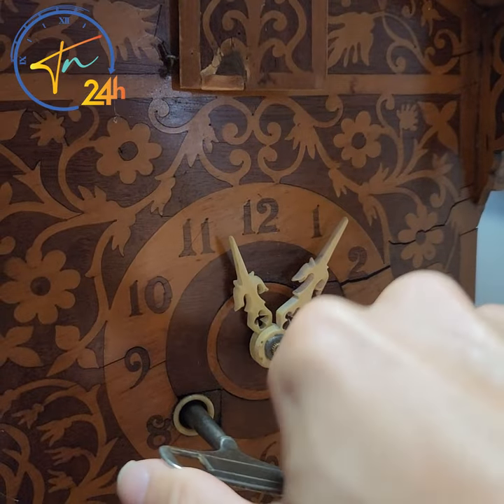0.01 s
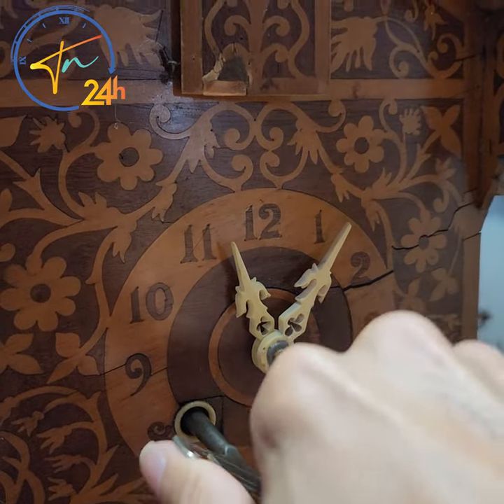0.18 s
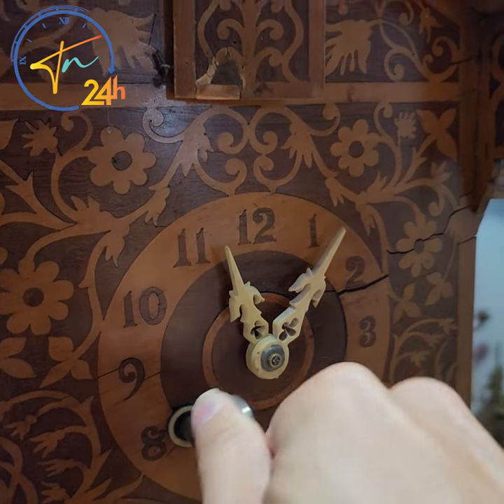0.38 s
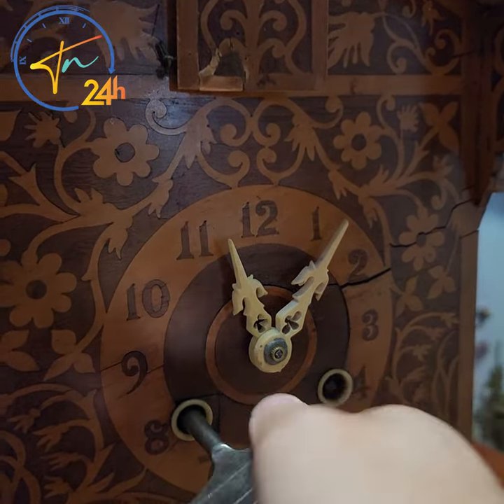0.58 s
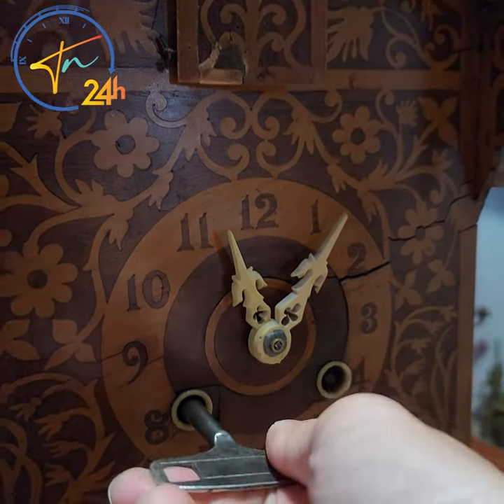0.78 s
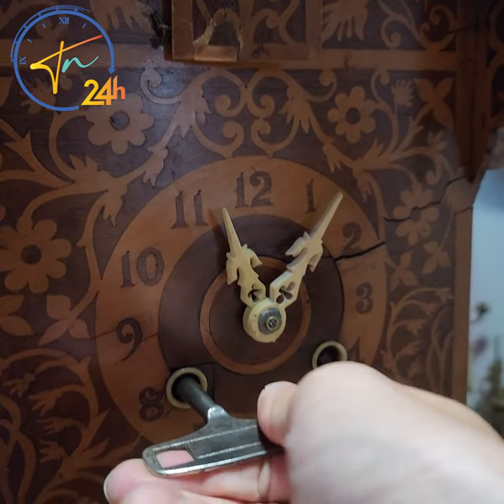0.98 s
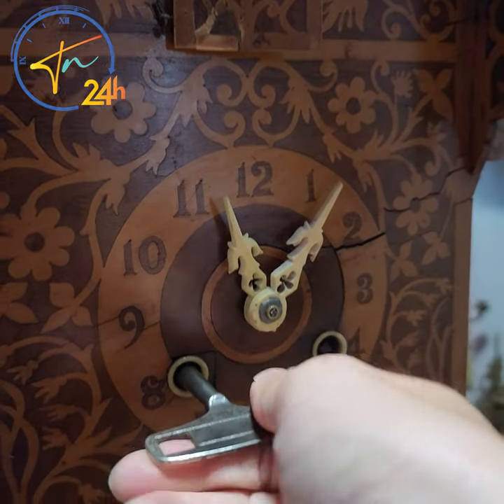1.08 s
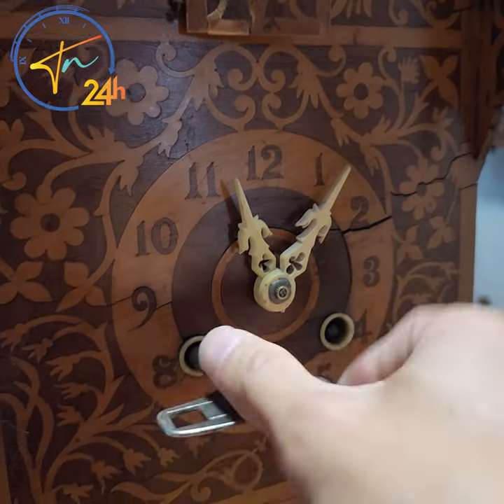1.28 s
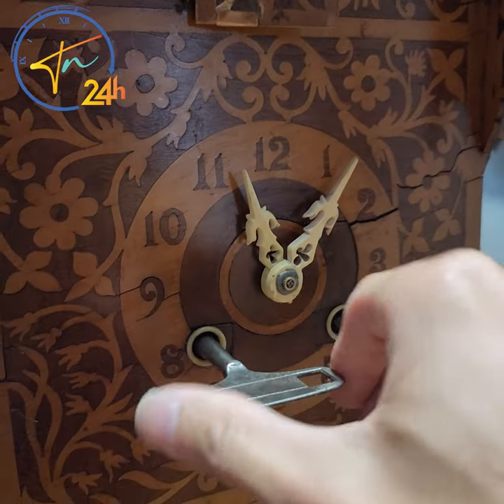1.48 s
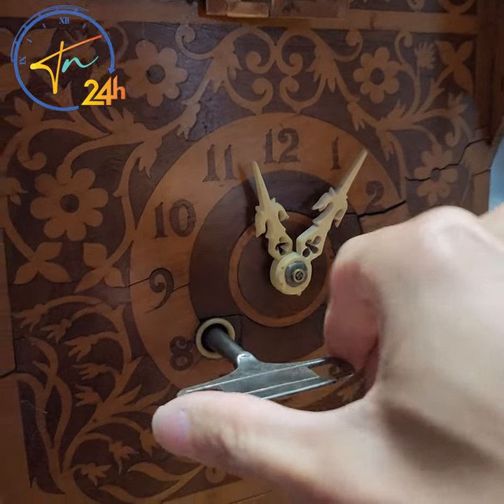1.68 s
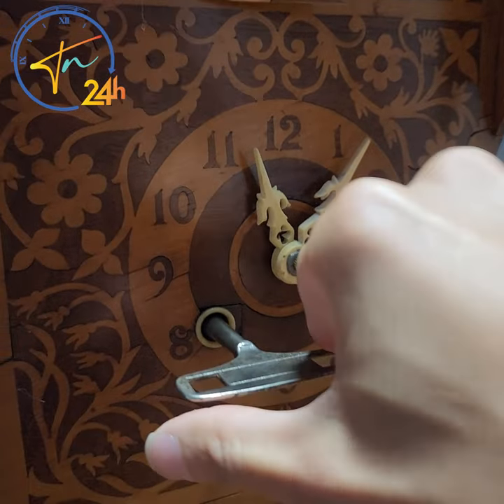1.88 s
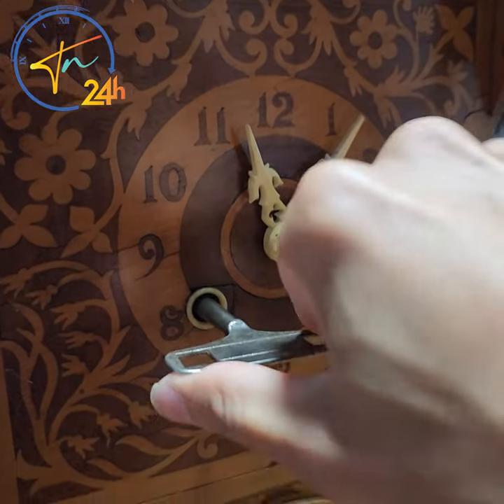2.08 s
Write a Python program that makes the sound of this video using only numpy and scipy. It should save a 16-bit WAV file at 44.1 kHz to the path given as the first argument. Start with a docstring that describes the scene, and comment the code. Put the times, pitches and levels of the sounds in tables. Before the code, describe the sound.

A key winds a wooden wall clock close by: nine quick, bright ratchet clicks from about 0.2 to 0.7 seconds. The loose key clinks lightly near 1.2 and 1.45 seconds. Fingers thump and rumble softly on the hollow case throughout, strongest at 1.4 seconds. The clock ticks faintly, about every 0.4 seconds, over quiet room tone, with barely audible distant bird chirps in the second half.

```python
"""A key winds a wooden wall clock: the pawl snaps over nine ratchet teeth, ringing metal and case.
The escapement ticks on, the loose key rattles, and fingers thump and rumble on the hollow case.
A quiet room answers the knocks over its steady tone; birds chirp faintly far outside."""
import sys
import numpy as np
from scipy import signal
from scipy.fft import rfft, irfft, next_fast_len
from scipy.io import wavfile
from scipy.ndimage import uniform_filter1d, map_coordinates

SR = 44100
rng = np.random.default_rng(int(sys.argv[2]) if len(sys.argv) > 2 else 0)


def materialize(psi):
    """Save the field psi as 16-bit PCM at rate SR to the path in sys.argv[1].

    A 1-D psi becomes a single channel; in a 2-D psi each row is a channel.
    """
    bounded = np.clip(np.atleast_2d(psi).T, -1, 1)
    quanta = np.round(bounded * 32767).astype(np.int16)
    wavfile.write(sys.argv[1], SR, quanta)


N = 92610

# stereo image of room tone and rumble, narrow in the bass: f/Hz, left-right likeness
BED_LIKENESS = [(30, 0.94), (200, 0.9), (600, .6), (1500, .1), (9000, .1)]


def amp(db):
    """Decibels to linear gain."""
    return 10 ** (np.asarray(db) / 20)


def unit(x):
    """Normalise to rms 1."""
    return x / np.sqrt(np.mean(x ** 2) + 1e-20)


def crest(x):
    """Normalise the loudest 4 ms to rms 1."""
    return x / np.sqrt(np.max(uniform_filter1d(np.mean(x ** 2, 0), size=176)))


def along(points, hz):
    """Read a curve of (f/Hz, value) points on a log frequency axis."""
    f, v = np.transpose(points)
    return np.interp(np.log(hz + 1), np.log(f + 1), v)


def add(track, start, sound):
    """Mix a sound in, start seconds into the track."""
    part = track[..., round(start * SR):][..., :sound.shape[-1]]
    part += sound[..., :part.shape[-1]]


def filtered(x, response):
    """Filter x through a complex frequency response."""
    size = next_fast_len(x.shape[-1] + SR // 4)
    spectrum = rfft(x, size) * response(np.fft.rfftfreq(size, 1 / SR))
    return irfft(spectrum, size)[..., :x.shape[-1]]


def resonances(modes):
    """Response of a resonator bank (f/Hz, width/Hz, gain/dB) with alternating polarity."""
    return lambda f: sum((-1) ** k * amp(db) * 1j * f * width / (hz * hz - f * f + 1j * f * width)
                         for k, (hz, width, db) in enumerate(modes))


def right_lag(hz, lag_s=0.00034, above_hz=700):
    """Response that delays the right channel; in the bass both sides move together."""
    delay = lag_s * hz ** 2 / (hz ** 2 + above_hz ** 2)
    return np.exp(-2j * np.pi * hz * delay * np.array([[0], [1]]))


def paired(noises, likeness, eq):
    """Mix two noises as mid and side into a stereo pair of given likeness and EQ."""
    def mid_side(hz):
        angle = np.arccos(np.clip(along(likeness, hz), -1, 1)) / 2
        return amp(along(eq, hz)) * [np.cos(angle), np.sin(angle)]
    mid, side = filtered(noises, mid_side)
    return np.array([mid + side, mid - side])


def room_tone(level_db=-63):
    """A steady, bass-heavy bed of air."""
    # spectrum of the air: f/Hz, gain/dB
    eq = [(20, -3.5), (60, -6), (150, -13), (250, -9), (400, -19.5), (700, -26), (1500, -28), (2300, -30),
          (3200, -39), (5000, -37.5), (6100, -36.5), (7500, -35), (9300, -45.5), (10500, -57),
          (16000, -86.5)]
    air = paired(rng.standard_normal((2, N)), BED_LIKENESS, eq)
    return amp(level_db) * unit(filtered(air, right_lag))


def room_reverb(x, wet_db=-12, rise_s=0.001):
    """The room's answer: a fresh noise tail, each frequency dying at its own speed."""
    # reverb time: f/Hz, t60/s
    decay = [(150, .25), (400, .3), (1000, 0.82), (2000, 0.41), (4000, 0.69), (8000, 0.63), (12000, 0.34),
             (16000, 0.12)]
    # colour of the tail: f/Hz, gain/dB
    eq = [(200, -0.5), (500, 4.5), (1000, -2), (2000, 5.5), (4000, -8), (8000, -5), (12000, 0.5),
          (16000, 4)]
    # stereo image of the tail: f/Hz, left-right likeness
    likeness = [(150, 0.97), (400, .9), (1000, .6), (4000, .5), (12000, 0.1)]
    hz, t, spectra = signal.stft(rng.standard_normal((2, SR * 3 // 4)), SR, nperseg=256)
    spectra *= amp(-60 * t / along(decay, hz)[:, None])
    tail = paired(signal.istft(spectra, SR, nperseg=256)[1], likeness, eq)
    tail *= 1 - np.exp(-np.arange(tail.shape[1]) / SR / rise_s)
    return amp(wet_db) * signal.fftconvolve(x, tail / np.linalg.norm(tail[0]), axes=1)


def far_birds(width_hz=220):
    """Whistles blurred by distance: narrow noise under a quick rise and a slower fall."""
    # bird calls: t/s, length/s, f/Hz, level/dB
    chirps = [(0, 0.032, 5880, -80), (0.038, 0.052, 6020, -87), (1.27, .08, 7300, -72),
              (1.38, .06, 6200, -79.5), (1.795, 0.045, 6030, -77.5), (1.847, 0.035, 3680, -79),
              (1.843, .04, 7400, -71.5), (1.91, .045, 7800, -71.5)]
    out, t = np.zeros((2, N)), np.arange(SR // 8) / SR
    for start, length, hz, db in chirps:
        noise = rng.standard_normal((2, len(t)))
        noise = noise + 1.1 * noise[0]  # partly shared, leaning left
        whistle = filtered(noise, lambda f: resonances([(hz, width_hz, 0)])(f) ** 2)
        progress = np.minimum(t / length, 1)
        add(out, start, amp(db) * unit(whistle) * np.sin(np.pi * progress ** 0.73))
    return out


def hand_rumble(lumps_db=2, lumps_per_s=14):
    """Hands on the case make a low, lumpy rumble, nearly mono."""
    # rumble envelope: t/s, level/dB
    envelope = [(0.0, -71), (0.12, -59), (0.21, -63.5), (0.37, -49), (0.44, -59.5), (0.56, -53.5),
                (1.02, -64.5), (1.06, -52.5), (1.25, -53), (1.37, -69.5), (1.48, -48.5), (1.54, -51.5),
                (1.6, -58.5), (1.68, -63.5), (1.73, -52.5), (1.78, -68), (1.82, -60.5), (2.1, -67.5)]
    # rumble spectrum: f/Hz, gain/dB
    eq = [(15, -7.5), (35, -3), (60, 0.5), (95, 0.5), (170, -4), (260, -2.5), (400, -13.5), (700, -25.5),
          (1500, -52.5)]
    t = np.arange(N) / SR
    times, db = np.transpose(envelope)
    lumps = map_coordinates(rng.standard_normal(64), [t * lumps_per_s])
    rumble = paired(rng.standard_normal((2, N)), BED_LIKENESS, eq)
    return unit(amp(lumps_db * lumps) * rumble) * amp(np.interp(t, times, db))


def finger_thumps(rise_s=0.008, beat_hz=22.2, upper_db=-8.5, gain_db=3.5, send_db=3):
    """Soft finger pads ring the two lowest wall modes of the case, which beat."""
    # finger landings: t/s, relative level/dB, lower mode f/Hz, t60/s
    thumps = [(0.101, -50.5, 233.4, 0.3), (0.314, -36.5, 235, 0.14), (0.599, -43, 230, 0.23),
              (0.734, -34.5, 238, 0.16), (0.881, -42.5, 242, 0.12), (1.029, -39.5, 247.7, 0.094),
              (1.19, -44.5, 236.8, 0.14), (1.402, -27.5, 237, 0.1), (1.571, -35.5, 246, 0.094),
              (1.693, -37, 239.2, 0.16), (1.922, -54.5, 239, 0.19)]
    out, t = np.zeros((2, N)), np.arange(SR // 3) / SR
    attack = 1 - np.exp(-(t / rise_s) ** 2)
    for start, db, hz, t60 in thumps:
        walls = np.sin(2 * np.pi * hz * t) + amp(upper_db) * np.sin(2 * np.pi * (hz + beat_hz) * t)
        ring = amp(db + gain_db) * attack * amp(-60 * t / t60) * walls * np.ones((2, 1))
        add(out, start, ring)
        add(out, start, amp(send_db) * room_reverb(ring))
    return out


def contacts(events, modes, rise_s, hold_s, t60, metal_db, case_db, rough_db, scatter_db, likeness):
    """Each contact scrapes the metal into ringing and pushes roughly on the case; the room answers."""
    # wooden case modes, rung by every contact: f/Hz, width/Hz, gain/dB
    case_modes = [(357, 35, -11.5), (527, 44, 2), (735, 19, 1.5)]
    # four bands of the metal's ring, low to high: from f/Hz, to f/Hz
    bands = [(0, 2800), (2800, 4500), (4500, 9200), (9200, 20000)]
    out, t = np.zeros((2, N)), np.arange(SR // 8) / SR
    envelope = np.minimum(t / rise_s, 1) ** 2 * amp(-60 * np.maximum(t - rise_s - hold_s, 0) / t60)
    angle = np.arccos(likeness) / 2
    left_right = np.array([[1], [-1]])
    for time, knock_db, pan_db, *band_dbs in events:
        mid, side = rng.standard_normal((2, len(bands), 1, len(t)))
        scrapes = envelope * (np.cos(angle) * mid + np.sin(angle) * side * left_right)
        struck_modes = [(hz, width, db + rng.normal(0, scatter_db)) for hz, width, db in modes]
        metal = np.zeros((2, len(t)))
        for (low, high), db, scrape in zip(bands, band_dbs, scrapes):
            bank = resonances([mode for mode in struck_modes if low < mode[0] <= high])
            ring = filtered(scrape, lambda f: bank(f) / (1 + 1j * f / high) ** 2)
            metal += amp(db + metal_db) * crest(ring)
        push = envelope ** 8 + amp(rough_db) * envelope * rng.standard_normal(len(t))  # pulse plus grit
        knock = amp(knock_db + case_db) * crest(filtered(push[None], resonances(case_modes)))
        hit = filtered(metal + knock, right_lag) * amp(pan_db / 2 * left_right)
        add(out, time - rise_s / 2, hit)
        add(out, time - rise_s / 2, room_reverb(hit))
    return out


def key_rattles():
    """The loose key clinks in its play."""
    # clinks: t/s, knock level/dB, left over right/dB, ring level/dB in four bands (levels relative)
    rattles = [(.096, -63.5, -3, -54, -69.5, -73, -95.5), (1.183, -47.5, 6.5, -47, -56, -62, -85),
               (1.191, -43, 2.5, -36.5, -41.5, -46, -69), (1.399, -52, -3, -56, -90, -70, -95),
               (1.443, -44.5, -1, -55, -63.5, -71.5, -98), (1.452, -38.5, 0.5, -42, -49, -59.5, -75),
               (1.484, -50, 9, -61, -74, -71, -95), (1.919, -53, 5.5, -65, -70, -75, -95)]
    # key modes: f/Hz, width/Hz, gain/dB
    modes = [(944, 100, -0.5), (1490, 220, -3), (2050, 220, -5), (2880, 170, -4.5), (3572, 250, 0),
             (5300, 250, -0.5), (6900, 1300, 2), (7400, 250, 2), (8596, 450, -15), (10000, 600, 0)]
    return contacts(rattles, modes, rise_s=0.0038, hold_s=0.0009, t60=0.0421, metal_db=-6.5,
                    case_db=-3.5, rough_db=-6.3, scatter_db=2, likeness=0.46)


def escapement_ticks():
    """The escapement catches with a light tick, mostly doubled by a rebound."""
    # ticks: t/s, knock level/dB, left over right/dB, ring level/dB in four bands (levels relative)
    ticks = [(0.125, -50.5, -0.5, -45, -57, -49, -60), (0.133, -50, 6, -64.5, -63, -56, -69),
             (0.865, -47, 2, -44.5, -56, -56.5, -66), (1.238, -52, -1.5, -49.5, -60.5, -52, -71),
             (1.25, -51, 4.5, -53, -60, -54.5, -63), (1.603, -51, 2, -46, -61, -56, -60),
             (1.612, -55, -3, -55.5, -62.5, -66.5, -72), (1.995, -51, 3.0, -50, -63.5, -56, -66),
             (2.007, -52.5, -0.5, -53, -64, -55.5, -65)]
    # escapement modes: f/Hz, width/Hz, gain/dB
    modes = [(960, 120, -8.5), (1217, 110, 1.5), (1563, 90, 0), (1985, 230, -3), (2860, 120, -5.5),
             (3650, 190, -5), (5030, 500, -4), (6380, 300, -5), (7500, 300, 4), (8000, 500, 2.5),
             (9530, 470, 2.5), (11500, 600, -19.5), (14500, 1500, -14)]
    return contacts(ticks, modes, rise_s=0.0014, hold_s=0.0004, t60=0.057, metal_db=2,
                    case_db=-2, rough_db=7, scatter_db=2.5, likeness=0.44)


def pawl_snaps():
    """As the key winds the spring, the pawl drops over each ratchet tooth with a bright snap."""
    # snaps: t/s, knock level/dB, left over right/dB, ring level/dB in four bands (levels relative)
    snaps = [(0.236, -31.5, 1, -28, -24.5, -20, -24), (0.307, -33, 2.4, -26.5, -27.5, -17.5, -21.5),
             (0.37, -30.5, 0.97, -27, -21.5, -20.5, -21.5), (0.435, -33, 1.5, -27.5, -26, -21, -19.5),
             (0.49, -27, 1, -27.5, -27, -17, -20.5), (0.547, -28, 1.4, -30, -25.5, -18, -23.5),
             (0.593, -32, 1, -25, -28.5, -17, -23), (0.645, -33, 0.74, -30, -28, -17.5, -21.5),
             (0.725, -33, 1, -26, -30, -20, -20)]
    # ratchet modes: f/Hz, width/Hz, gain/dB
    modes = [(1010, 160, -4), (1246, 420, -1.5), (1560, 410, 1.5), (1834, 110, 4), (2277, 560, -1.5),
             (2660, 300, -10), (3323, 250, 0), (4178, 130, 5), (4870, 400, -3), (6340, 800, -4),
             (7130, 900, -3), (7317, 700, 5), (8742, 290, -8.5), (10410, 800, -6), (11725, 700, -2),
             (13150, 2400, -1.5), (14300, 500, 0), (15800, 470, -11)]
    return contacts(snaps, modes, rise_s=0.0018, hold_s=0.0012, t60=0.021, metal_db=2,
                    case_db=-3.5, rough_db=-4.5, scatter_db=2, likeness=0.43)


def scene():
    """Clockwork up front; hands, birds and room tone behind."""
    clockwork = pawl_snaps() + escapement_ticks() + key_rattles()
    hands_and_birds = finger_thumps() + hand_rumble() + far_birds()
    return clockwork + filtered(hands_and_birds, right_lag) + room_tone()


def record(dry, cutoff_hz=16600):
    """A steep low-pass trims the very top."""
    return filtered(dry, lambda hz: 1 / (1 + (hz / cutoff_hz) ** 160))


dry = scene()
out = record(dry)
materialize(out)
```